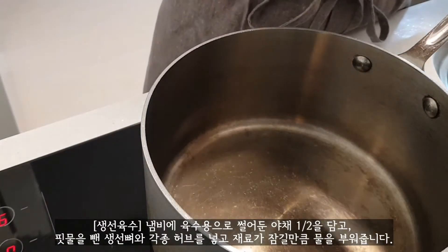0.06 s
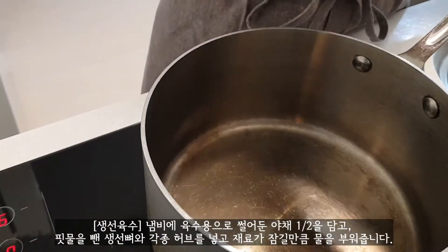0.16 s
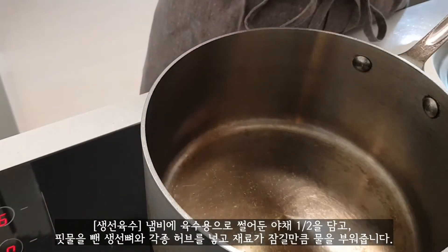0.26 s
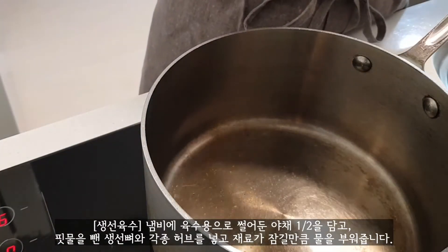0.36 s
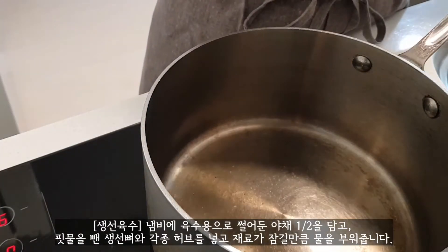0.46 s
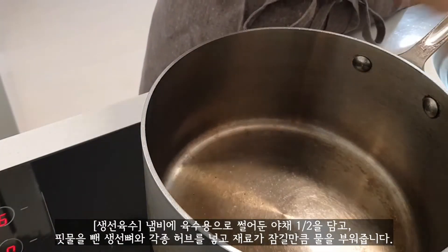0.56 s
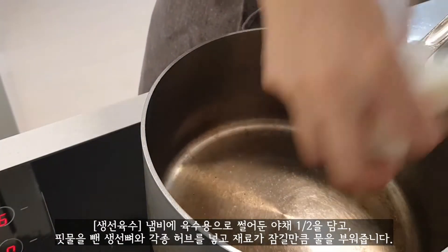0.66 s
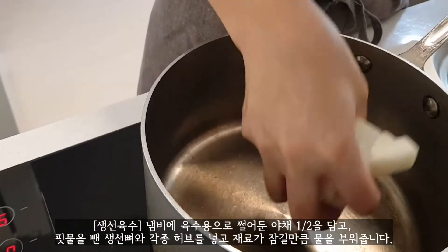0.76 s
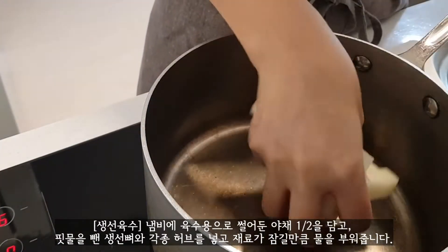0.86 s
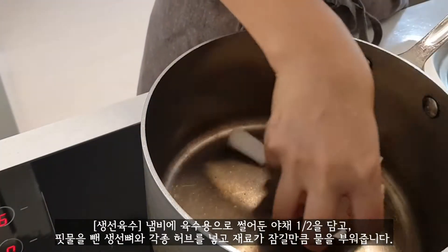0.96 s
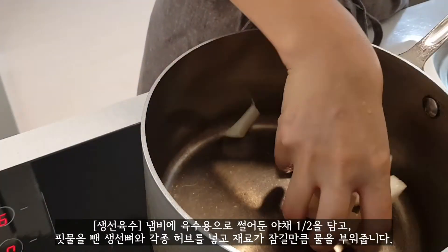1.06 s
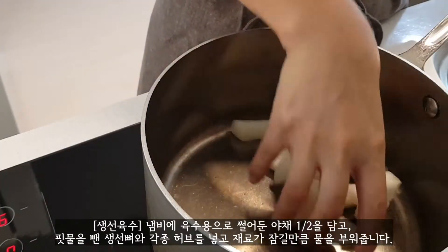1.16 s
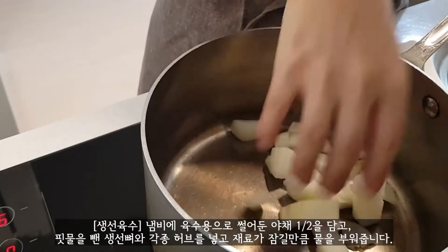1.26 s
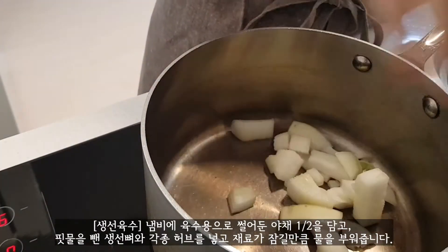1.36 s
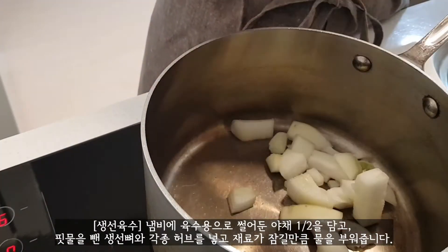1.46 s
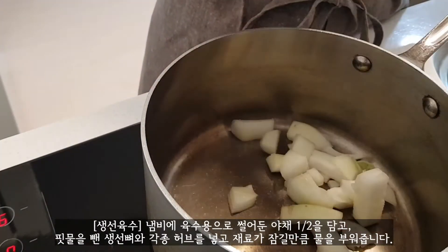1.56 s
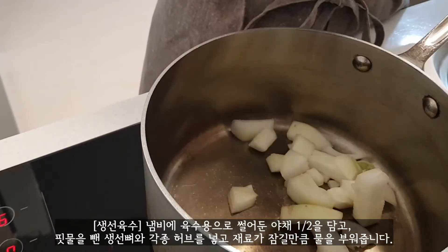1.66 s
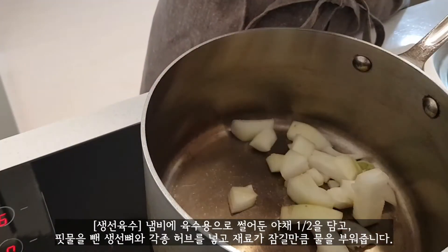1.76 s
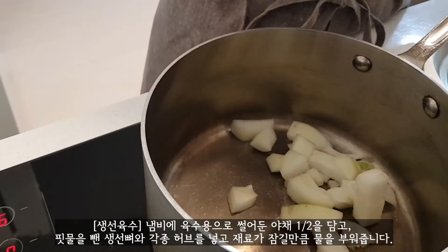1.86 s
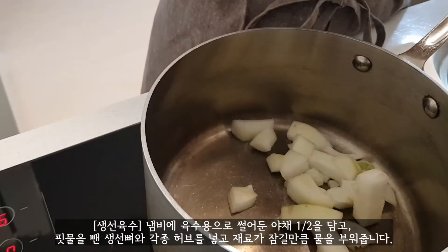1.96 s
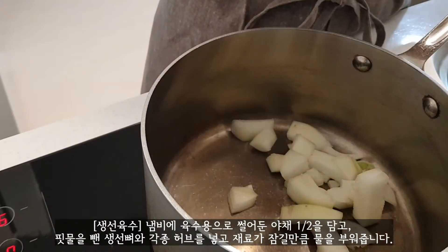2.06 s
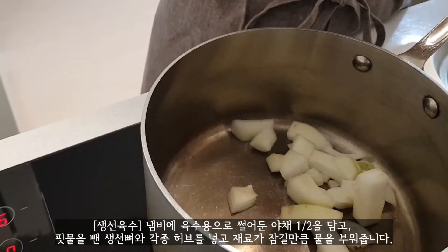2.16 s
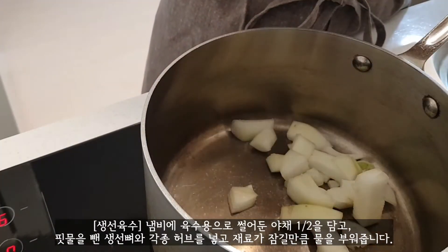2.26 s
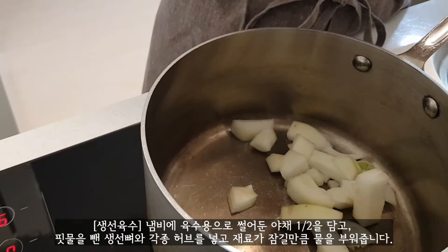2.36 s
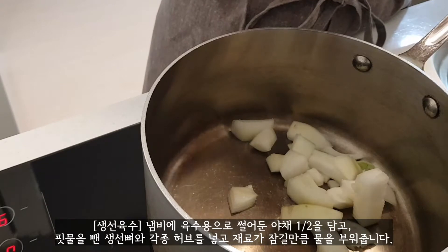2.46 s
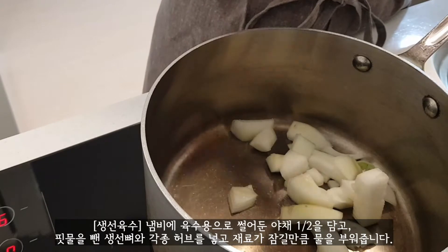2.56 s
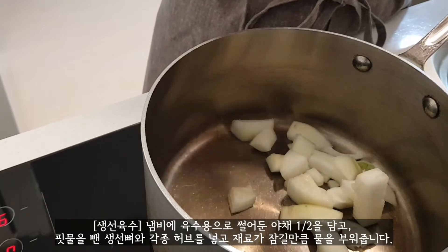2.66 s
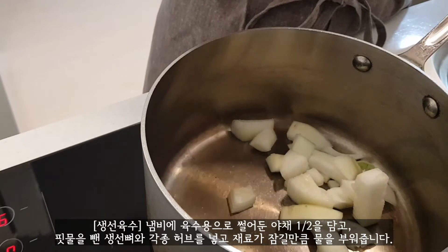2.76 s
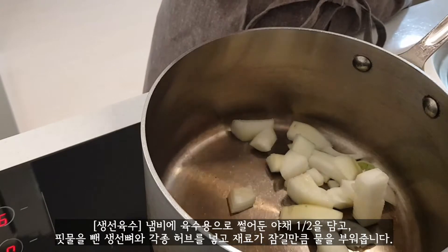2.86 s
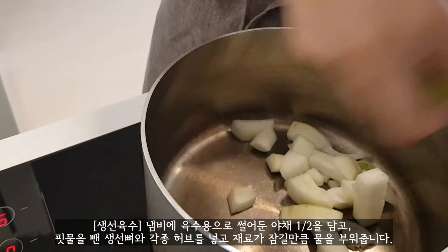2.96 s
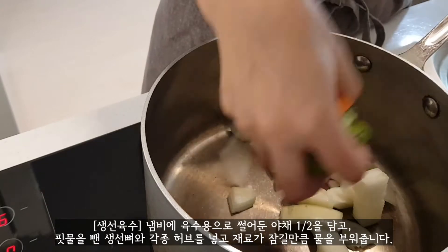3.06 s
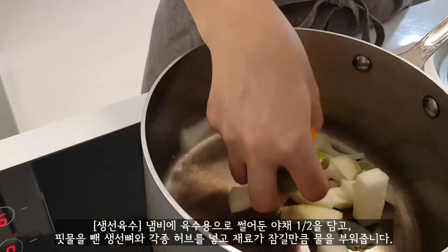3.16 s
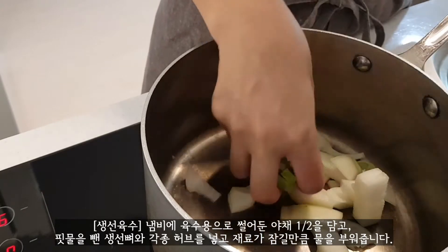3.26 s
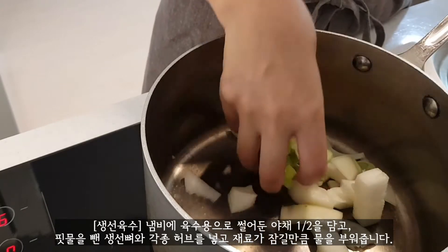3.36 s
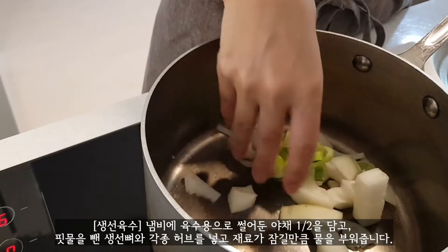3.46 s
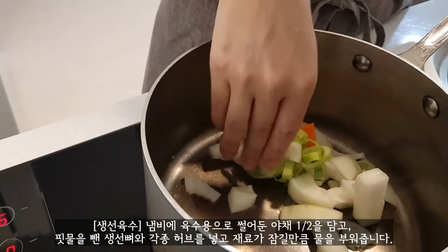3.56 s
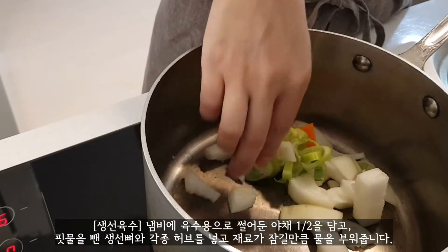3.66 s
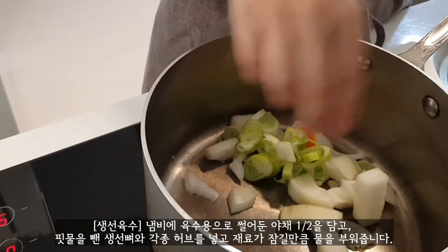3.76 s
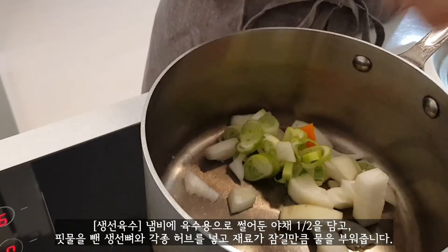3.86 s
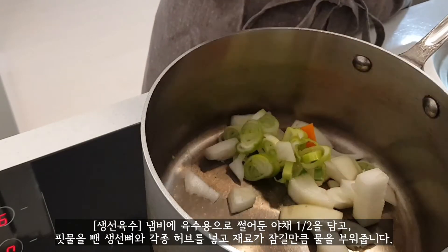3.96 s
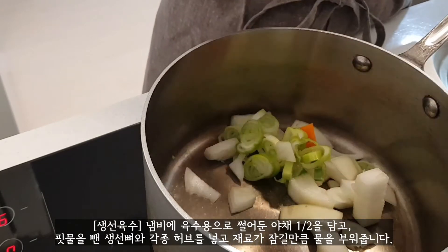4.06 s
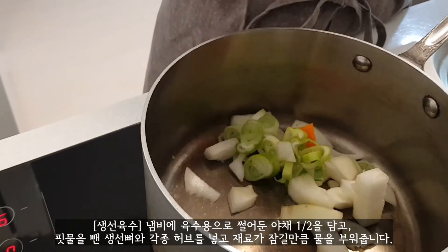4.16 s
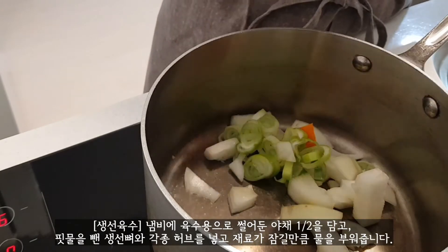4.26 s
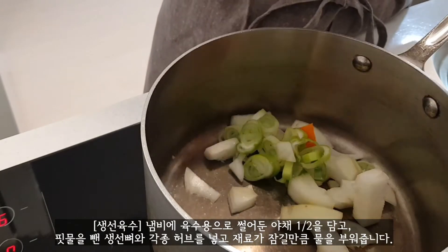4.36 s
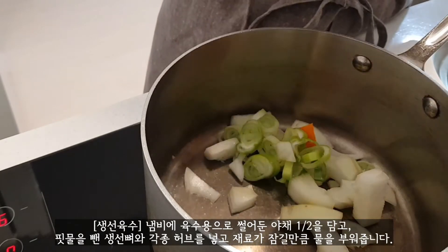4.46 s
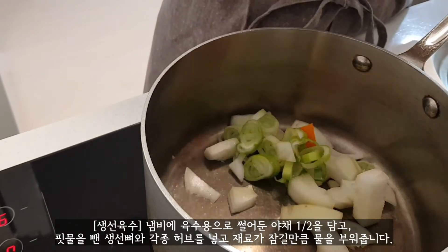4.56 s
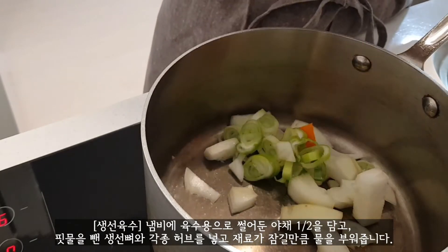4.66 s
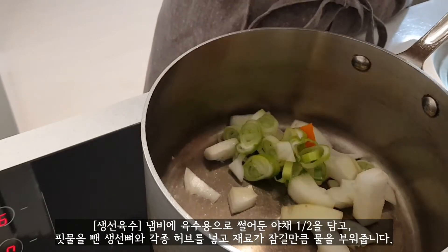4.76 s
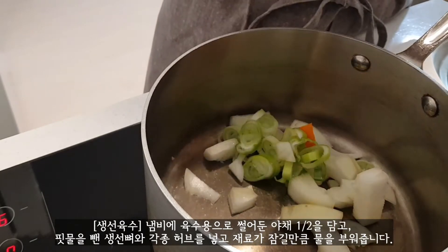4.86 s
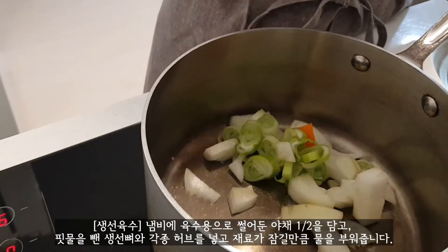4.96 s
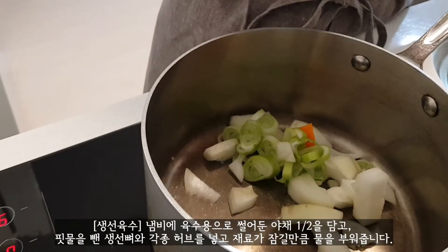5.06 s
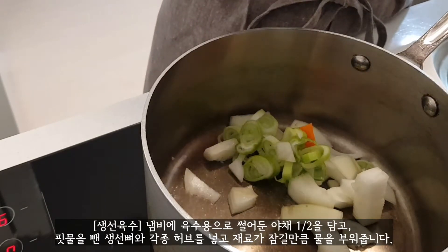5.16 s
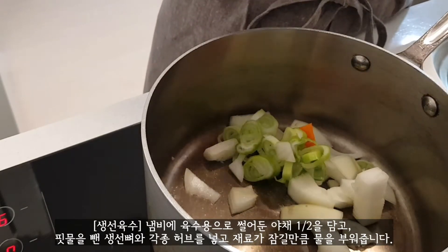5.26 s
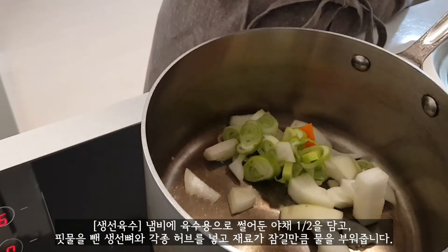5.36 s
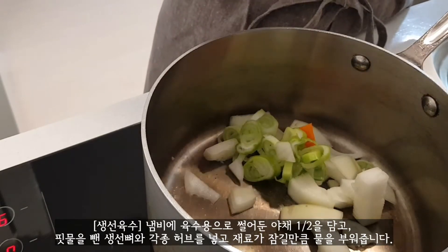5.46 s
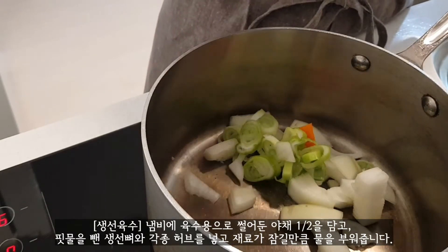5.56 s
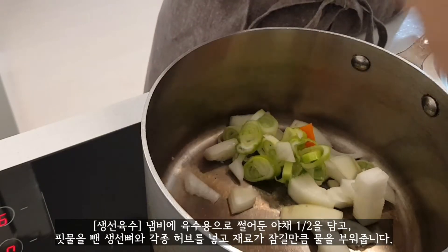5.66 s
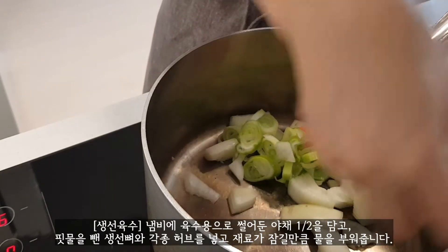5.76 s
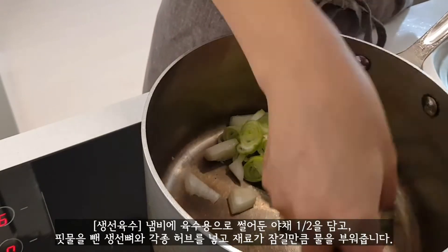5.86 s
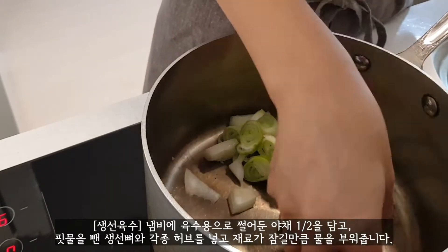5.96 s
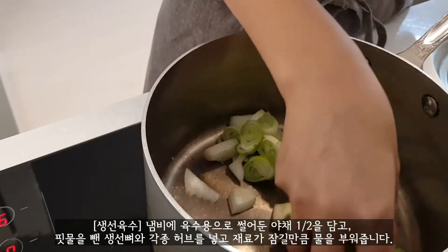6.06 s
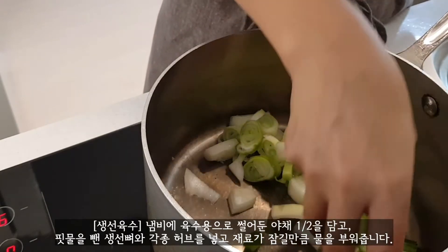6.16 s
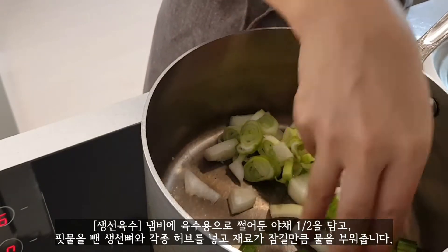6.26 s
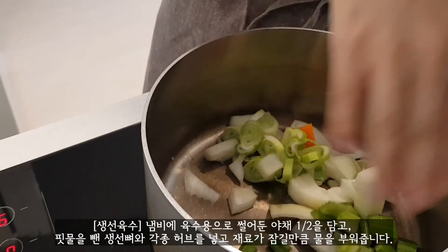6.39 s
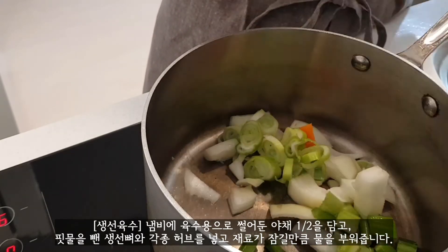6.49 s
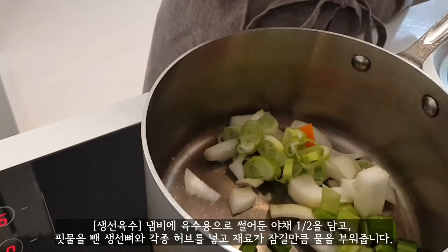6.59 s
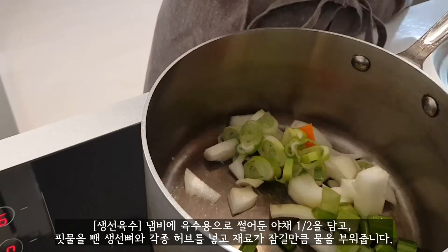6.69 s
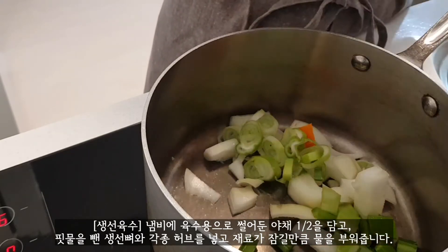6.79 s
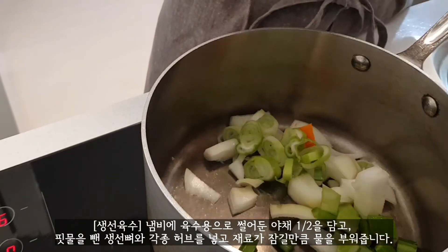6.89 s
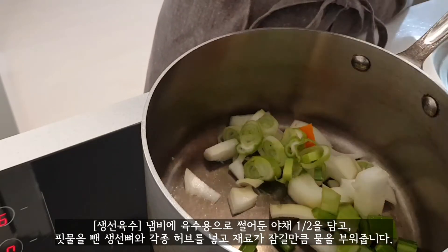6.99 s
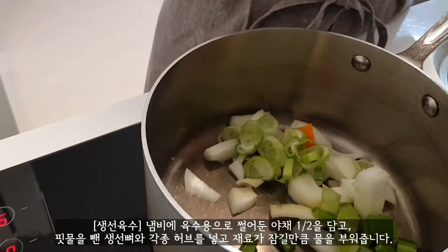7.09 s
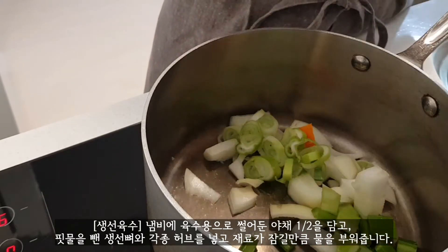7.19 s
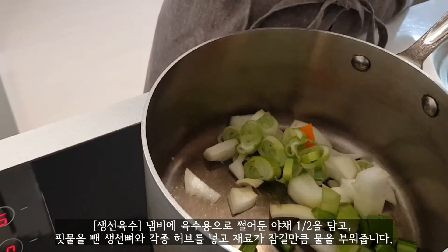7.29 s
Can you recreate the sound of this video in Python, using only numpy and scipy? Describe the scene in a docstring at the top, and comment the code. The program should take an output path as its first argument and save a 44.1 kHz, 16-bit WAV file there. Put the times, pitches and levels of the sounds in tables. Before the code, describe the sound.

A kitchen extractor hums low and hisses throughout. A handful of chopped vegetables lands in an empty steel saucepan as a quick cluster of dull, briefly metallic taps. One or two more pieces drop later. Then a steel bowl clanks loudly twice against the worktop, and after a pause a heavy knock comes with a second handful tumbling into the pan. Close stereo microphone, small indoor room, sounds leaning left.

```python
"""Through it all an extractor rumbles and hums, noise rushes in its duct and air hisses on top.
A handful of chopped vegetables drops into a steel saucepan: rough pushes ring damped pan modes.
A few more pieces land; then a steel bowl clanks twice amid dull worktop knocks, all ringing modes.
The first peak over a threshold turns the gain down 3 dB; it is held, then creeps back.
More worktop knocks follow, and with them a second handful lands and tumbles in the pan."""
import sys
import numpy as np
from scipy import signal
from scipy.fft import rfft, irfft, next_fast_len
from scipy.io import wavfile
from scipy.ndimage import uniform_filter1d, map_coordinates

SR = 44100
rng = np.random.default_rng(int(sys.argv[2]) if len(sys.argv) > 2 else 0)


def digitize_waveform(pressure):
    """Quantize a signal to 16-bit integers and store it at the path in sys.argv[1].

    Rows of a 2-D input are taken as channels; values are limited to [-1, 1].
    """
    field = np.atleast_2d(pressure).T
    bounded = np.clip(field, -1, 1)
    quanta = np.round(bounded * 32767).astype(np.int16)
    wavfile.write(sys.argv[1], SR, quanta)


N = 323253

# Levels are drive levels, spectra are relative shapes: the functions trim, rescale and pan them.
# Pieces landing in the pan: start_s, level_db, upper_modes_db, wall_modes_db, weight_db (thud against level)
PIECE_LANDINGS = [(0.967, -38, 0.5, -6, -10), (1.0, -41.5, 2, -16, 5.5), (1.025, -43, 3, -8, 9.5),
                  (1.073, -40.5, -2.5, -10.5, 3), (1.095, -37.5, -14, -13, -8), (1.106, -43, -13, -9, 3),
                  (1.171, -38, -5, -8.5, -9), (1.18, -41.5, -18, -15, 4), (1.21, -35, -15, -8, 0),
                  (1.249, -49, -0.5, -9, 6), (1.274, -42.5, -12, -14, 6), (1.374, -44.5, -2.5, -8, -2.5),
                  (3.123, -33, -6.5, -10, -4), (3.295, -50, 0.5, -4.5, 3), (5.862, -29.5, -6.5, -9.5, 2.5),
                  (6.009, -38.5, -3, -3, 8.5), (6.111, -46.5, 3.5, -6, 6.5), (6.148, -36.5, -13, -9, -1.5),
                  (6.191, -40.5, -10, -2, -3), (6.227, -36, -5, -4.5, -14), (6.243, -45, 1, -8, -9),
                  (6.278, -48, -8, -7, -5), (6.295, -50, 3, -5, -3.5), (6.325, -55, -17, -10, 8),
                  (6.428, -44, -20, -7, -0.5), (6.451, -35.5, -9, -2, -14), (6.489, -49, -4, -5, -3),
                  (6.519, -46, -17, -9, -3)]
# Free modes of the saucepan: pitch_hz, level_db, t60_s
PAN_MODES = [(462, 0.5, 0.071), (680, 5.5, 0.055), (778, -3, 0.067), (949, 3.5, 0.062), (1114, 4.5, 0.068),
             (1223, 4.5, 0.12), (1540, 6, 0.023), (1810, 3.5, 0.039), (2107, 5.5, 0.04),
             (2430, -3.5, 0.035), (2580, -2, 0.043), (3190, 0.5, 0.027), (3940, -1, .03)]
# Small pieces rolling and settling after a handful is let go: start_s, hold_s, level_db
TUMBLES = [(0.97, 0.26, -57.5), (6.05, 0.22, -53.5)]
# Pieces sliding off the fingers: start_s, hold_s, level_db
FINGER_SLIDES = [(0.995, 0.035, -50.5), (1.065, 0.015, -52), (1.17, 0.01, -52), (1.207, 0.012, -52),
                 (1.26, 0.03, -55)]
# The bowl meeting the worktop: start_s, rattle_db, rattle_tilt_db_per_octave, rattle_t60_s
BOWL_CLANKS = [(4.6902, -20.5, 2, 0.071), (4.788, -28, -2, 0.19)]
# Pitches of the bowl's modes: pitch_hz
BOWL_PITCHES = [500, 650, 745, 768, 1192, 1202, 1260, 1556, 1810, 2085, 2307, 2353, 2683, 3436, 3577, 3700,
                4240, 4455, 4552, 4649, 4782, 4975, 5506, 6498, 7063, 7843, 10140, 11060]
# The same bowl modes, a row each: first_clank_db, second_clank_db, t60_s, left_minus_right_db
BOWL_MODES = [(-31, -43, 0.17, 12.5), (-48, -30, 1, 3), (-36, -38, 0.64, 2), (-25, -33, 0.14, 12),
              (-29, -30, 0.71, 7.5), (-30.5, -33, 0.52, 12), (-39.5, -35, 0.35, 4), (-40, -40, 0.23, 8),
              (-39, -39, 0.21, -6), (-27.5, -49, 0.13, 12), (-26, -45, 0.28, 10), (-23, -27, 0.12, 12),
              (-24, -42, 0.19, 20), (-25, -38, 0.38, -3), (-15.5, -22, 0.093, -3.5), (-28, -42, 0.29, 2),
              (-19, -28, 0.062, 11), (-32, -42, 0.11, 1), (-29, -45, 0.18, 6), (-26.5, -41, .1, 14),
              (-32, -51, .2, 11), (-24, -39, 0.1, 10), (-23, -46, 0.1, 8), (-25.5, -45, 0.068, 17),
              (-29.5, -55, 0.1, 14.5), (-42, -60, 0.39, 13), (-31.5, -59, 0.062, 7), (-35, -62, .07, 4)]
# Colour of the rim rattle: pitch_hz, density_db (per Hz)
RATTLE_COLOUR = [(180, -54), (300, -17), (769, -3.5), (1220, -13.5), (1390, -14), (2320, -1.5), (2520, -11),
                 (2740, -6), (3180, -10.5), (10400, -26.5), (15500, -40)]
# Stereo balance of the rattle: pitch_hz, left_minus_right_db
RATTLE_BALANCE = [(60, 9), (150, 4), (380, 5), (950, 8), (2380, 6.5), (5980, -3), (15000, 5)]
# The bowl comes to rest and the worktop damps it: start_s, fade_s, loss_db
BOWL_REST = (4.865, 0.022, 16.7)
# Dull knocks on the worktop: start_s, level_db, tilt_db_per_octave
WORKTOP_KNOCKS = [(4.29, -45, -17), (4.336, -52, -10), (4.696, -25.5, 2.5), (4.72, -29.5, 2.5),
                  (4.789, -34.5, 7), (5.847, -21.5, 0), (5.882, -28.5, 0)]
# Free modes of the worktop and stove top: pitch_hz, level_db, t60_s
WORKTOP_MODES = [(50.7, -1.5, 0.17), (69.5, 1.5, 0.66), (86.8, 3, 0.25), (124.2, -1.5, 0.33),
                 (149.8, 6, 0.26), (183.9, 4.5, 0.26), (210, 2, 0.11), (275.4, -1, 0.21),
                 (346.4, -11.5, 0.14), (427.5, -11, 0.13), (530, -8, 0.15)]
# How fast the room dies away: pitch_hz, t60_s
ROOM_DECAY = [(200, 0.43), (1000, 0.35), (3000, 0.36), (10000, 0.14)]
# Colour of the extractor's rumble: pitch_hz, density_db (per Hz)
RUMBLE_COLOUR = [(12, -36), (20, -20), (48, -3), (91, -4.5), (107, -4.5), (123, -4.5), (134, -5.5),
                 (145, -9.5), (165, -9.5), (199, -18.5), (232, -16.5), (290, -30.5), (330, -28.5),
                 (430, -54), (730, -120)]
# Colour of the air in the duct: pitch_hz, density_db (per Hz)
DUCT_COLOUR = [(160, -22), (280, -8.5), (359, -6.5), (412, 0.5), (451, -5), (544, -0.5), (657, -1),
               (719, 2), (786, -1.5), (851, -2.5), (2100, -15), (2340, -15.5), (3000, -26), (3900, -39),
               (6600, -120)]
# Colour of the high air hiss: pitch_hz, density_db (per Hz)
HISS_COLOUR = [(1590, -48), (2700, -23), (3540, -2.5), (4260, -4), (4680, 0.5), (5540, -2), (7880, -3),
               (11600, -9), (14800, -26.5), (15600, -32)]
# Likeness of the two channels in steady noise, 1 is mono: pitch_hz, likeness
STEREO_LIKENESS = [(25, .8), (60, 1), (180, 0.86), (290, 0.13), (600, 0.33), (1000, -0.039), (1400, 0.058),
                   (9000, -0.038)]
# Stereo balance of the steady and sliding sounds: pitch_hz, left_minus_right_db
STEADY_BALANCE = [(60, 7), (330, 4), (500, 12.5), (2800, 9), (3200, 6), (6000, 5.5), (7900, 8.5),
                  (8500, 8.5), (12000, 2), (15000, 5.5)]

HUM_HZ, TOP_HZ = 119.9, 15450
CONTACT_T60_S = 0.038  # how long a piece squashes against the steel
LOWER_DB, LOWER_PER_WEIGHT = -6, 0.55  # heavier pieces reach the lower modes more
RING_SHARE, SHARE_PER_WALL_DB = 0.65, 0.02  # share of free ring time under a wet piece; more near the wall
TUMBLE_ATTACK_S, TUMBLE_RELEASE_DB_PER_S = 0.024, 41
SLIDE_ATTACK_S, SLIDE_RELEASE_DB_PER_S = 0.0055, 300
SLIDE_TILT_DB = 7  # brighter than the steady hiss, roughly per octave


def pan_regions():
    """Masks for the pan's upper, lower and side wall modes."""
    upper = octaves(PAN_MODES, 1350) > 0
    lower = octaves(PAN_MODES, 720) < 0
    wall = (octaves(PAN_MODES, 1010) > 0) & ~upper
    return upper, lower, wall


def landings():
    """Soft wet pieces squash and roll on the pan floor: a short rough push rings it; the stove top thuds."""
    out = np.zeros((2, N))
    t = np.arange(SR // 12) / SR
    upper, lower, wall = pan_regions()
    for s, db, upper_db, wall_db, weight_db in PIECE_LANDINGS:
        lower_db = LOWER_DB + LOWER_PER_WEIGHT * weight_db
        colour_db = db - 3 + upper * upper_db + lower * lower_db + wall * wall_db
        share = max(RING_SHARE + SHARE_PER_WALL_DB * wall_db, 0.1)
        floor = ring(PAN_MODES, colour_db, 1.0, 0.0001, 0.00014, share, size=SR // 10)
        # part of the push is common to both channels
        push = rng.standard_normal(len(t)) + 0.74 * rng.standard_normal((2, len(t)))
        push = push * amp(-60 * t / CONTACT_T60_S) * (1 - np.exp(-t / 0.0027))
        push[:, 0] = 0.5 * np.linalg.norm(push[0])  # the first touch is one clean tap
        landing = signal.fftconvolve(floor, push, axes=1)
        add(out, s, landing * np.linalg.norm(floor) / np.linalg.norm(landing))
        thud_db = db + weight_db - 11.0 + 3 * octaves(WORKTOP_MODES, 157)
        add(out, s, ring(WORKTOP_MODES, thud_db, 3.8, 0, 0.0054, 0.54, size=SR // 7))
    return out


def tumbling():
    """Many small bumps of uneven strength ring the pan floor, well damped."""
    upper, lower, wall = pan_regions()
    bumps = rng.standard_normal((2, N)) * amp(7.2 * wobble(70))
    floor = ring(PAN_MODES, -5 * upper - 4 * lower - 3 * wall, 0, 0, 0.00053, 0.44, size=SR // 20)
    rolling = unit(signal.fftconvolve(bumps, floor, axes=1)[:, :N])
    return rolling * swell(TUMBLES, TUMBLE_ATTACK_S, TUMBLE_RELEASE_DB_PER_S)


def finger_slides():
    """Friction of pieces leaving the fingers: bright, flickering noise in short swells."""
    skin = rush(HISS_COLOUR, patchy_db=2.0)
    skin = filtered(skin, lambda hz: amp(SLIDE_TILT_DB * np.log2(hz / 6000 + 0.1)))
    level = swell(FINGER_SLIDES, SLIDE_ATTACK_S, SLIDE_RELEASE_DB_PER_S) * amp(2.7 * wobble(120))
    return level * sided(unit(skin), STEADY_BALANCE)


def pieces():
    """Pan landings and tumbling lean to the left; the slides keep their own balance."""
    return amp([[4], [-4]]) * (landings() + tumbling()) + finger_slides()


def bowl():
    """Each clank rings the bowl's modes under a short noisy rattle of its rim; the worktop then damps it."""
    tones, rattle = np.zeros((2, N)), np.zeros((2, N))
    t = np.arange(SR // 3) / SR
    *clank_db, ring_t60, pan_db = np.transpose(BOWL_MODES)
    port_db = np.outer([0.5, -0.5], pan_db)
    for (s, rattle_db, tilt_db, t60), db in zip(BOWL_CLANKS, clank_db):
        tones[:, round(s * SR):] = 0  # a new contact stops the ring of the last
        modes = np.transpose([BOWL_PITCHES, db, ring_t60])
        add(tones, s, ring(modes, port_db, 0.5, -0.000079, 0.00089))
        scrape = rng.standard_normal(len(t)) + 1.9 * rng.standard_normal((2, len(t)))
        noise = unit(filtered(scrape, lambda hz: amp(
            along(RATTLE_COLOUR, hz) + tilt_db * np.log2(hz / 1200 + 0.1))))
        fade_db = rattle_db - 60 * np.maximum(t - 0.012, 0) / t60
        add(rattle, s, noise * amp(fade_db) * (1 - np.exp(-t / 0.0016)))
    rest_s, fade_s, loss_db = BOWL_REST
    settled = np.clip((np.arange(N) / SR - rest_s) / fade_s, 0, 1)
    return (tones + sided(rattle, RATTLE_BALANCE)) * amp(-loss_db * settled)


def knocks():
    """Dull blows shake the worktop, whose low modes start in step and die away."""
    out = np.zeros((2, N))
    for s, db, tilt_db in WORKTOP_KNOCKS:
        colour_db = db - 5.0 + tilt_db * octaves(WORKTOP_MODES, 106)
        add(out, s, ring(WORKTOP_MODES, colour_db, 2.5, 0.00037, 0.0049, sense=0.98))
    return amp([[3], [-3]]) * out


def kitchen(x):
    """Room tail of decaying noise: each frequency of the answer dies at its own speed."""
    hz, t, z = signal.stft(rng.standard_normal((2, SR // 2)), SR, nperseg=256)
    decay = amp(-60 * t / along(ROOM_DECAY, hz)[:, None])
    tail = signal.istft(z * decay, SR, nperseg=256)[1]
    delayed = np.pad(tail, ((0, 0), (220, 0)))  # 5 ms before the room answers
    return signal.fftconvolve(x, delayed / np.linalg.norm(tail[0]), axes=1)[:, :N]


def extractor():
    """Motor hum at twice the mains, rumble, air in the duct and a high hiss, the first three wavering."""
    phase = 2 * np.pi * HUM_HZ * np.arange(N) / SR + 0.2 * wobble(3)
    hum = amp(-44.5 + 0.96 * wobble(2.93)) * np.sin(phase)
    rumble = amp(-45.5 + 2.36 * wobble(2.834)) * rush(RUMBLE_COLOUR, patchy_db=0.07)
    duct = amp(-60 + 1.04 * wobble(4.26)) * rush(DUCT_COLOUR, patchy_db=2.0)
    hiss = amp(-46.0) * rush(HISS_COLOUR, patchy_db=0.8)
    return sided(hum + rumble + duct + hiss, STEADY_BALANCE)


def ring(modes, extra_db, scatter_db, lag_s, attack_s, shorten=1, size=SR // 2, sense=-1):
    """Damped modes at both ports; with sense -1 neighbours swing oppositely, so close pairs swell and beat."""
    hz, db, t60 = np.transpose(modes)[..., None]
    t = np.arange(size) / SR
    level_db = db + scatter_db * rng.standard_normal(hz.shape) - 60 * t / (t60 * shorten)
    swing = amp(level_db) * sense ** np.arange(len(hz))[:, None]
    gains = amp(np.broadcast_to(extra_db, (2, len(hz))))
    # the lag shifts the right port's sines only
    both = [gain @ (swing * np.sin(2 * np.pi * hz * (t - lag))) for gain, lag in zip(gains, (0, lag_s))]
    return np.array(both) * (1 - np.exp(-t / attack_s))


def rush(spectrum, patchy_db):
    """Turbulent stereo noise of rms 1 with time-frequency patches of random gain."""
    z = signal.stft(rng.standard_normal((2, N + 512)), nperseg=512)[2]
    field = uniform_filter1d(rng.standard_normal(z.shape[1:]), size=6, axis=0)
    field = uniform_filter1d(field, size=14, axis=1)
    pair = signal.istft(z * amp(patchy_db * unit(field)), nperseg=512)[1][:, :N]

    def mid_side(hz):
        """Coloured mid and side gains that give the wanted likeness."""
        turn = np.arccos(np.clip(along(STEREO_LIKENESS, hz), -1, 1)) / 2
        return amp(along(spectrum, hz)) * [np.cos(turn), np.sin(turn)]

    mid, side = filtered(pair, mid_side)
    return unit(np.array([mid + side, mid - side]))


def swell(rows, attack_s, release_db_per_s):
    """Gain per sample: each (start_s, hold_s, level_db) row rises, holds and dies away."""
    t = np.arange(N) / SR
    gain = np.zeros(N)
    for s, hold_s, db in rows:
        fade_db = release_db_per_s * np.maximum(t - s - attack_s - hold_s, 0)
        gain += np.clip((t - s) / attack_s, 0, 1) * amp(db - fade_db)
    return gain


def wobble(rate):
    """A smooth random curve, rate knots a second."""
    return map_coordinates(rng.standard_normal(int(N * rate / SR) + 4), [np.arange(N) * rate / SR])


def sided(pair, balance):
    """Split a left minus right balance evenly between the two ports, frequency by frequency."""
    return filtered(pair, lambda hz: amp(np.outer([0.5, -0.5], along(balance, hz))))


def filtered(x, response):
    """x shaped by a gain that depends on frequency."""
    n = x.shape[-1]
    m = next_fast_len(n + 8192)
    return irfft(rfft(x, m) * response(np.fft.rfftfreq(m, 1 / SR)), m)[..., :n]


def along(points, hz):
    """Read a curve of (pitch_hz, value) points on a log frequency axis."""
    f, v = np.transpose(points)
    return np.interp(np.log(hz + 1), np.log(f + 1), v)


def octaves(modes, ref_hz):
    """How far each mode lies above ref_hz."""
    return np.log2(np.array(modes)[:, 0] / ref_hz)


def add(track, s, sound):
    """Lay a sound onto the track at s seconds."""
    k = round(s * SR)
    track[:, k:k + sound.shape[1]] += sound[:, :N - k]


def amp(db):
    """dB to gain."""
    return 10 ** (np.asarray(db) / 20)


def unit(x):
    """Scaled to rms 1."""
    return x / np.sqrt(np.mean(x ** 2) + 1e-20)


def gain_control(x, above_db, cut_db, attack_s, hold_s, release_s):
    """The first peak over the threshold turns the gain down; it is held, then creeps back."""
    loud = np.flatnonzero(np.abs(x).max(axis=0) > amp(above_db))
    start_s = loud[0] / SR if len(loud) else N  # N lies past the end: no cut
    since = np.arange(N) / SR - start_s
    corners = np.cumsum([0, attack_s, hold_s, release_s])
    return x * amp(-np.interp(since, corners, [0, cut_db, cut_db, 0]))


def scene():
    """All sources, with the room answering the pieces and the bowl."""
    drops, clank = pieces(), bowl()
    room = kitchen(amp(-12) * clank + amp(-8.5) * drops)
    return drops + clank + knocks() + room + extractor()


def record(dry):
    """Gain control, then a steep cut of everything from TOP_HZ up."""
    held = gain_control(dry, above_db=-12, cut_db=3.0, attack_s=0.12, hold_s=2.15, release_s=0.28)
    return filtered(held, lambda hz: hz < TOP_HZ)


dry = scene()
out = record(dry)
digitize_waveform(out)
```